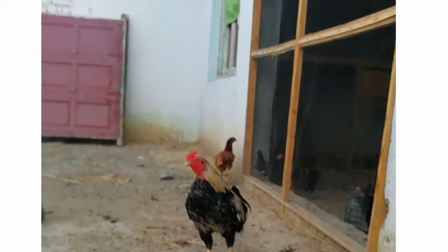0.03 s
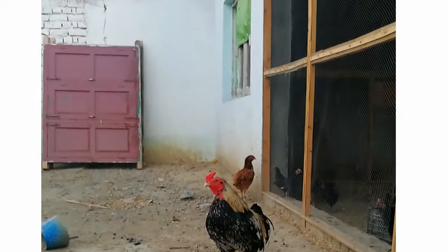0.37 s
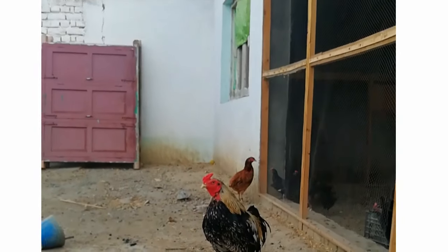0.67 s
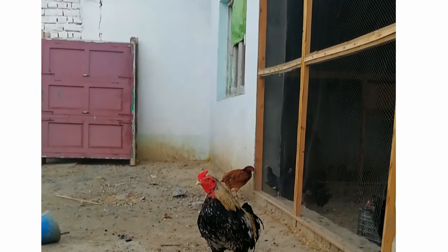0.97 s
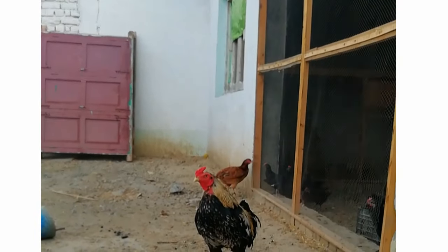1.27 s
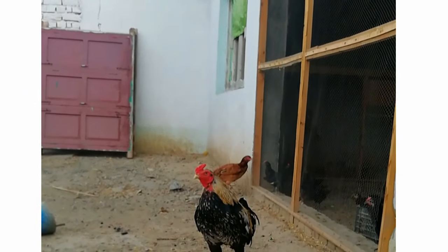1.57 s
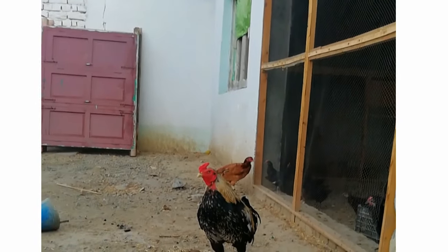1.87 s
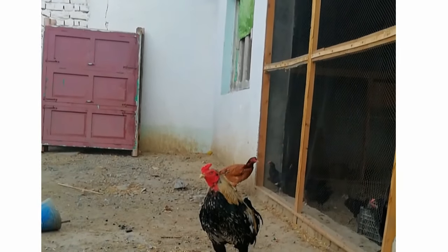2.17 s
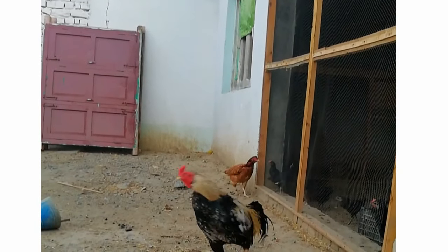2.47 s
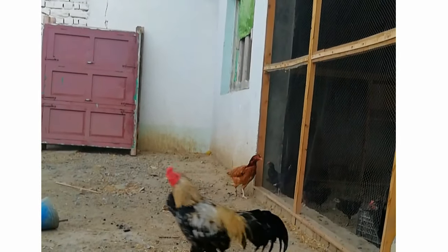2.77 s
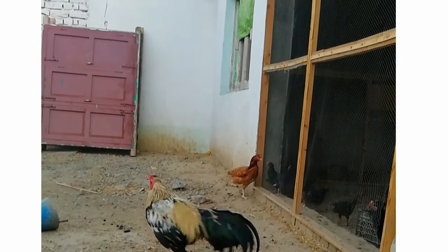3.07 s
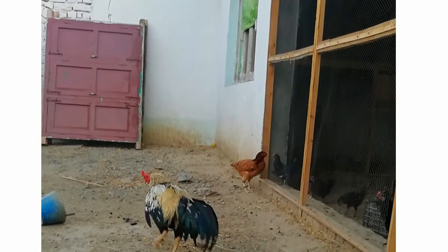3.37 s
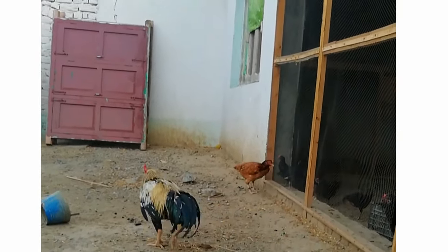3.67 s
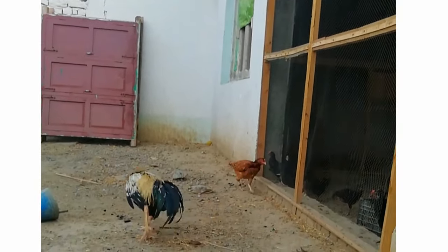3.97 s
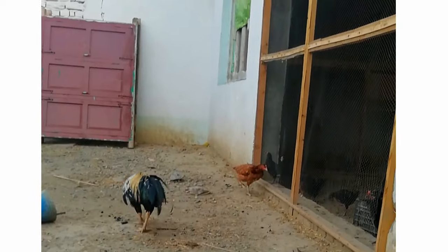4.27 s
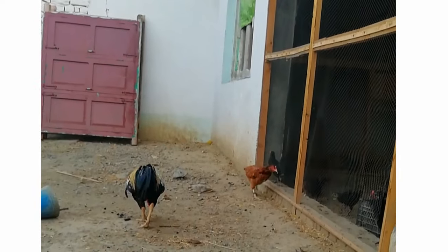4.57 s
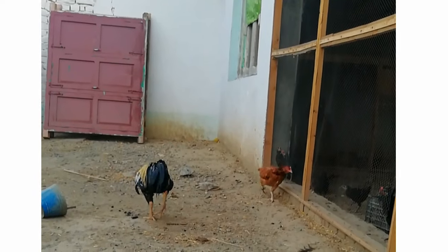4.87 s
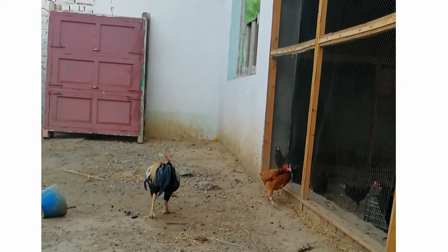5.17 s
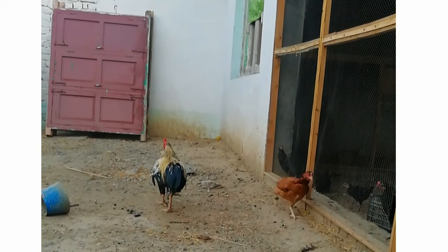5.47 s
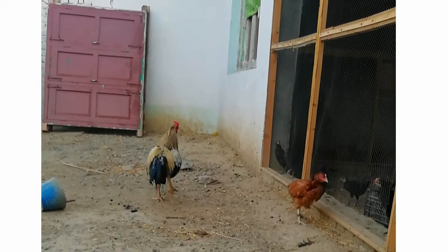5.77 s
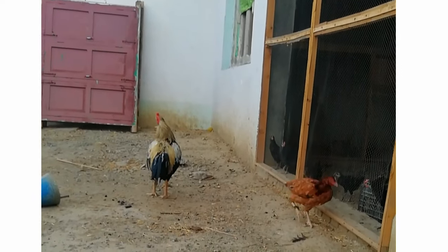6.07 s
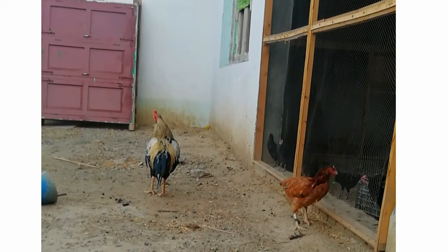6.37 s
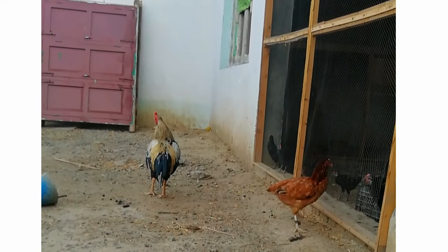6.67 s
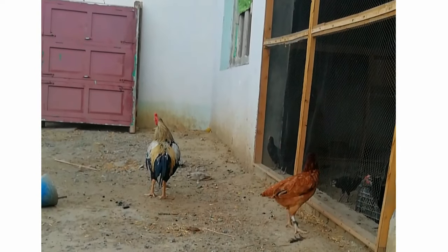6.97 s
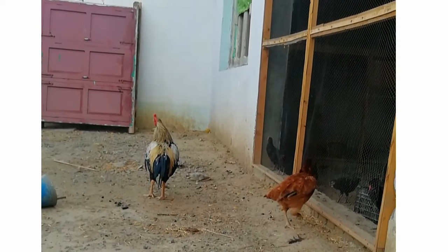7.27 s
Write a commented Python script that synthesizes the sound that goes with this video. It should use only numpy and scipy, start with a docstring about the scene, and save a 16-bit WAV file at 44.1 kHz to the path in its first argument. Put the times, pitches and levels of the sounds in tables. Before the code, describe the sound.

Young chickens whistle high, falling peeps throughout, one close by and the rest inside a coop. Feet scuff and beaks tick now and then. A rooster adds short clucks after a second, and hens join with strained whines and rasps. Near the end a few alarmed chips lead into the loudest whines. The close stereo sound carries short wall echoes over a faint outdoor wash.

```python
"""Chickens in a small walled yard, a close microphone pair beside a wire-fronted coop.
From the start young birds whistle falling peeps, one near by, the rest inside the coop; feet scuff
and beaks tick. A rooster clucks from 1 s on. From 2.4 s hens whine on a strained membrane and rasp
in pulses that ring the throat. Alarmed chips just before 6 s lead into the loudest whines and two
clucks with a low thud. The walls throw every call back over a faint outdoor wash and hum."""
import sys
import numpy as np
from scipy import signal
from scipy.fft import rfft, irfft
from scipy.io import wavfile

SR = 44100
rng = np.random.default_rng(int(sys.argv[2]) if len(sys.argv) > 2 else 0)


def master(y):
    """Save y as 16-bit WAV."""
    cut = np.clip(np.atleast_2d(y).T, -1, 1)
    pcm = np.round(cut * 32767)  # scale
    wavfile.write(sys.argv[1], SR, pcm.astype(np.int16))


N = 327663

# Event levels are at the source, ahead of filters and placing. Swell is the rise in level from start
# to end of a call; arch is the bend in frequency at mid-call.
# peeps close to the microphones: t/s, length/s, held f/Hz, leap/Hz, drop/Hz, level/dB, swell/dB
NEAR_PEEPS = [(0.062, 0.071, 3780, -4.5, 2233, -33.5, -2), (0.521, 0.34, 3952, 720, 390, -38.5, 6),
              (1.326, 0.27, 3865, 750, 397, -36.5, 9.5), (1.854, 0.18, 3897, 691, 1097, -34.5, 6.5),
              (4.215, 0.15, 3694, 221, 563, -43, 2.5), (4.615, .182, 4060, 263.5, 710, -41.5, 1),
              (5.36, 0.19, 3895, 627, 454, -40, 0)]
# peeps inside the coop: t/s, length/s, start f/Hz, end f/Hz, arch/Hz, level/dB, swell/dB
FAR_PEEPS = [(0, 0.051, 4780, 4270, 86, -47, -14), (0, 0.053, 2310, 2090, -17, -61.5, -8),
             (0.031, 0.07, 2490, 2320, 123, -58, -25), (0.293, 0.12, 1700, 2107, -18.5, -63.5, 11),
             (0.423, 0.13, 4430, 3370, -260, -60.5, -2), (0.568, 0.081, 2130, 1900, 12, -70, -7),
             (0.654, 0.096, 2660, 2670, 270, -64.5, -4), (0.7, 0.17, 3653, 2836, -120, -48, -1),
             (0.939, 0.091, 4040, 3640, -180, -60.5, -17), (1.116, 0.13, 2740, 2180, -130, -62.5, -2),
             (1.401, 0.086, 2570, 2100, 123, -55.5, -19), (1.485, 0.2, 3416, 2931, 41.5, -46, 7.5),
             (1.672, 0.081, 2635, 2174, 23, -54, -8), (1.771, 0.14, 2913, 2574, 35.5, -56.5, -2),
             (1.896, 0.084, 4700, 4650, 263, -56, 6), (1.92, 0.091, 3775, 2976, -11, -44, 2),
             (2.342, 0.073, 3550, 3750, 156, -64.5, 10), (2.547, 0.18, 3740, 3210, 280.5, -56, -2),
             (2.594, 0.13, 4670, 4540, 202.5, -59, 0), (2.737, 0.12, 4580, 3616, -230, -52.5, 6),
             (2.812, 0.089, 2570, 2290, 250, -54, -9), (2.898, 0.21, 3634, 2934, -59, -47.5, 11.5),
             (2.923, 0.15, 4870, 4620, 135, -59.0, 2), (3.104, 0.17, 4184, 3534, 151.5, -52, -1),
             (3.357, 0.051, 2390, 2130, 35, -54.5, -7), (3.371, 0.109, 3610, 2847, 6, -46.5, 7.5),
             (3.568, 0.22, 4295, 3650, -19.5, -53.5, 3), (3.781, 0.13, 3630, 2837, 25, -47.5, 5.5),
             (3.61, 0.17, 4720, 4390, 103, -60.5, 5), (3.951, 0.057, 3626, 3470, -64, -61, -8),
             (4.165, 0.12, 4460, 3800, -6, -61.5, -8), (4.178, 0.171, 5170, 4370, 79.5, -64, 8),
             (4.479, 0.14, 3650, 2770, 212.5, -56.5, 10), (4.667, 0.13, 4490, 2994, 143, -61.5, -8),
             (4.944, 0.12, 3650, 2486, 294.5, -55.5, 4.5), (5.024, 0.12, 4120, 3254, 142.5, -64, 5),
             (5.201, 0.06, 2456, 2210, 34, -62.5, -12), (5.766, 0.14, 3632, 3030, 78, -55, 11),
             (6.312, 0.198, 4704, 3110, 40.5, -62.0, 8), (6.517, 0.15, 3704, 3082, -29.5, -55, 6),
             (6.687, 0.14, 4920, 3440, 371.5, -56.5, -1), (6.842, 0.092, 4460, 4330, 31.5, -58, 4),
             (6.934, 0.1, 3604, 2833, 93.5, -46, 8.5), (7.147, 0.26, 4884, 3030, 400.5, -58.0, -4)]
# filter of a young bird's beak: f/Hz, gain/dB
BEAK_COLOUR = [(2000, 2.5), (4700, -0.5), (5400, -5), (6300, 7.5), (7200, -1.5), (8200, -7), (10000, -13),
               (15000, -5)]
# alarmed chips inside the coop: t/s, level/dB
ALARM_CHIPS = [(5.677, -49.5), (5.868, -48), (5.893, -55), (5.937, -54)]
# syllables of the hens' whines:
# t/s, length/s, start f/Hz, end f/Hz, arch/Hz, level/dB, swell/dB, roughness/0-1, 2nd harmonic/dB
HEN_WHINES = [(2.397, 0.18, 962, 954, 119, -41.5, -3, 0.31, -21.5),
              (3.203, .11, 1002, 1091, 28.5, -42, -2, 0.42, -16),
              (3.743, 0.051, 1295, 1256, 38, -47.5, 5, 0.1, -16.5),
              (3.887, 0.15, 1342, 1316, 3.5, -53.5, 2, .05, -13),
              (6.026, .155, 1103, 1062, 24.5, -33, 1, 0.43, -13),
              (6.172, 0.074, 1006, 970.5, -10.5, -31.5, -1, 0.16, -11),
              (6.295, 0.078, 1088, 1124, 19, -37, 2, .4, -21.5),
              (6.409, 0.067, 1158, 1185, 28, -34.5, -2, 0.5, -12),
              (6.51, 0.106, 1127, 1190, 12, -35, -11, 0.47, -17.5),
              (6.632, .13, 1134, 1161, 8, -36, -8.5, 0.4, -14.5),
              (6.79, .16, 1172, 1164, 9.5, -41.5, -1, 0, -7),
              (6.81, 0.19, 1068, 957, 50, -44, -13, 0.46, -18)]
# hens' rasps, f being the lowest throat resonance:
# t/s, length/s, start f/Hz, end f/Hz, arch/Hz, level/dB, swell/dB, pulse rate/Hz
HEN_RASPS = [(2.427, .22, 1220, 940, 40, -46.5, 8, 225), (3.191, 0.24, 974, 1120, 149, -44, 3.5, 265),
             (4.36, 0.38, 2280, 1670, -200, -58, 14, 68), (5.472, 0.081, 1000, 840, -130, -51.5, 0, 150),
             (5.867, 0.16, 1710, 1780, -70, -53, 7, 165), (6.01, 0.19, 2360, 1810, 36, -48, 0.5, 135),
             (6.79, 0.23, 995, 970, 112, -46, -6, 112)]
# resonances of a hen's throat: multiple of the lowest, width/Hz, gain/dB
HEN_THROAT = [(1, 170, 14), (1.45, 240, 6.5), (1.95, 450, -2), (4.3, 900, -21), (7, 700, -20.5)]
# rooster's clucks: t/s, level/dB, f/Hz, length/s, beak opening (factor on the throat's frequencies)
ROOSTER_CLUCKS = [(1.146, -40, 632, 0.029, 0.86), (1.519, -49, 587, 0.036, 0.79),
                  (1.989, -44, 667, 0.037, 0.79), (2.566, -40.5, 573, 0.055, 0.86),
                  (3.232, -33, 574.5, 0.038, 1), (3.823, -33.5, 592.4, 0.046, 0.98),
                  (4.455, -37.5, 544.5, 0.041, 0.9), (4.81, -36.5, 563, 0.029, 0.93),
                  (5.123, -34.5, 572.7, 0.032, 0.96), (5.565, -40, 545.4, 0.037, 0.89),
                  (6.288, -37, 598, 0.053, 0.88), (6.479, -41.5, 689, 0.041, 0.84),
                  (7.164, -51, 618, 0.053, 0.79)]
# filter of the rooster's throat: f/Hz, gain/dB
ROOSTER_THROAT = [(200, -18), (450, -23), (600, -11.5), (800, -4), (1050, 4.5), (1350, -0.5), (2000, -26),
                  (4000, -17), (8000, -72)]
# hoarse air and rustling feathers: t/s, length/s, level/dB, centre f/Hz
AIR_PUFFS = [(0.279, 0.13, -69, 4400), (2.135, 0.11, -63.5, 5100), (2.437, 0.14, -61, 5600),
             (3.131, 0.1, -52.5, 7150), (3.201, 0.19, -55.5, 5800), (3.941, 0.087, -66.5, 4900),
             (5.602, 0.23, -56, 4520), (5.854, 0.11, -50, 2940), (5.855, 0.11, -57, 5670),
             (5.995, 0.24, -64.5, 7450), (6.294, 0.48, -54, 2150), (6.493, 0.53, -67, 5900),
             (7.031, 0.14, -55.5, 4300)]
# spectrum of one puff: multiple of the centre, level/dB
PUFF_SPECTRUM = [(.1, -62), (.45, -21), (.75, 1), (1, 0.5), (1.25, -4.5), (1.7, -26.5), (4, -32)]
# dull low thuds: feet scuffing, and the low body of the two clucks near 6.3 and 6.5 s: t/s, level/dB
LOW_THUDS = [(.863, -57), (1.283, -55.5), (1.628, -61.5), (2.925, -64.5), (5.385, -58.5), (6.3, -48.5),
             (6.47, -53)]
# dull spectrum of a thud: f/Hz, level/dB
THUD_SPECTRUM = [(100, -14), (320, -3.5), (750, 6), (1500, 8), (3000, -5), (7000, -17), (15000, -60)]
# ticks of beaks and grit: t/s, level/dB
BEAK_TICKS = [(0.7407, -50), (0.8636, -38.5), (0.9892, -51), (1.0204, -46.5), (1.081, -51), (1.281, -47),
              (1.6285, -36.5), (2.9257, -49.5), (3.1537, -31), (3.167, -38), (4.7515, -59), (5.1113, -50),
              (5.3906, -41.5), (5.8027, -42), (5.8197, -39.5)]
# sharp spectrum of a tick: f/Hz, level/dB
TICK_SPECTRUM = [(1000, -34), (4000, 5.5), (7500, 4.5), (10000, -10.5), (15000, -33)]
# spectrum of the outdoor wash: f/Hz, level/dB
WASH_SPECTRUM = [(12, -41), (20, -1), (83, -4), (333, -16), (404, -19.5), (614, -22), (1340, -13),
                 (1870, -15), (2090, -15.5), (2330, -20), (3260, -15.5), (3640, -12.5), (5690, -22.5),
                 (7310, -21), (15500, -35)]
# reverberation between the walls: f/Hz, time to fall by 60 dB/s
WALL_DECAY = [(200, 0.82), (1000, 0.43), (3500, 0.55), (8000, 0.5), (15000, 0.092)]
# the microphone pair's filter on left minus right: f/Hz, gain/dB
SIDE_LIFT = [(40, -1), (110, 5.5), (200, 7.5), (380, 16), (700, 12), (1300, -1), (2500, 0), (8000, 0)]


def peeps(calls, jitter, flutter_db, second_db, third_db, hoarse_db, hoarse_hz, drift=0.00785):
    """Young birds' whistles: the high, strained part trembles and turns hoarse, the low part is purer."""
    out = np.zeros(N)
    for start, hz, strength in calls:
        strain = (hz / 4000) ** 2.97
        hz = hz * (1 + drift * wobble(len(hz), 19.5) + jitter * strain * wobble(len(hz), 113))
        hoarseness = 1 + from_db(hoarse_db) * strain * wobble(len(hz), hoarse_hz)
        flutter = from_db(flutter_db * wobble(len(hz), 42))
        add(out, start, syrinx(hz, [0, second_db, third_db]) * hoarseness * strength * flutter)
    return colour(out, BEAK_COLOUR)


def near_calls(leap_at_s=.032, leap_width_s=.038, sag_hz_per_s=1200, drop_s=.012):
    """The near bird's (start, pitch, strength): a leap, a slow sag, a drop as the breath ends."""
    for start, length, held_hz, leap_hz, drop_hz, db, swell_db in NEAR_PEEPS:
        t = np.linspace(0, length, int(length * SR))
        leap = leap_hz * np.exp(-((t - leap_at_s) / leap_width_s) ** 2)
        drop = drop_hz * np.exp((t - length) / drop_s)
        hz = held_hz + leap - sag_hz_per_s * t - drop
        yield start, hz, breath(length, db, swell_db, attack_s=.015, release_s=.0046)


def coop_calls():
    """The coop birds' (start, pitch, strength): one arched glide to a breath."""
    for start, length, start_hz, end_hz, arch_hz, db, swell_db in FAR_PEEPS:
        hz = glide(length, start_hz, end_hz, arch_hz)
        yield start, hz, breath(length, db, swell_db, attack_s=.0062, release_s=.0048)


def chips(top_hz=3400, bottom_hz=1450, length_s=.014):
    """Alarm in the coop: the pitch collapses by over an octave within a hundredth of a second."""
    out = np.zeros(N)
    progress = np.arange(int(length_s * SR)) / (length_s * SR)
    hz = np.interp(progress, [0, .7, 1], [top_hz, bottom_hz, bottom_hz])
    soft_edges = signal.windows.tukey(len(hz), 400 / len(hz))
    for start, db in ALARM_CHIPS:
        add(out, start, from_db(db) * syrinx(hz, [0, -13]) * soft_edges)
    return out


def whines(jitter=.069, shimmer_depth=.46, throb_depth=1.06, half_db=-17):
    """Hens hold notes; the strained membrane shakes, throbs and alternates strong and weak cycles."""
    out = np.zeros(N)
    for start, length, start_hz, end_hz, arch_hz, db, swell_db, rough, second_db in HEN_WHINES:
        hz = glide(length, start_hz, end_hz, arch_hz)
        hz *= 1 + jitter * rough * wobble(len(hz), 218)
        tone = syrinx(hz, [0, second_db, 2 * second_db - 12, second_db - 10.5])
        tone += syrinx(1.5 * hz, [half_db]) * rough * wobble(len(hz), 130)  # between harmonics 1 and 2
        throb = 1 + throb_depth * rough * np.tanh(wobble(len(hz), 68))
        shimmer = 1 + shimmer_depth * rough * wobble(len(hz), 116)
        strength = breath(length, db, swell_db, attack_s=.014, release_s=.02)
        add(out, start, tone * throb * shimmer * strength)
    return out


def rasps(unevenness=.03, air=.07, sag=.22):
    """Uneven pulses, slowing as the breath runs out, and a little air ring a hen's moving throat."""
    out = np.zeros(N)
    for start, length, start_hz, end_hz, arch_hz, db, swell_db, pulse_hz in HEN_RASPS:
        hz = glide(length, start_hz, end_hz, arch_hz)
        slowing = sag * np.linspace(.5, -.5, len(hz))
        cycles = np.cumsum(pulse_hz * np.exp(slowing + unevenness * wobble(len(hz), 120))) / SR
        pulses = np.diff(np.floor(cycles), prepend=0)
        drive = unit(pulses) + air * rng.standard_normal(len(hz))
        voice = sum(from_db(gain_db) * resonate(resonate(drive, k * hz, width), k * hz, 2 * width)
                    for k, width, gain_db in HEN_THROAT)
        add(out, start, unit(voice) * breath(length, db, swell_db, attack_s=.0072, release_s=.033))
    return colour(out, [(100, -16), (8200, 5.5), (10500, -5), (15000, -35)])


def clucks(jitter=.06, break_ratio=.59):
    """The rooster's short note swells, then its pitch breaks downwards as the beak shuts."""
    out = np.zeros(N)
    for start, db, pitch_hz, length, opening in ROOSTER_CLUCKS:
        progress = np.linspace(0, 1, int(length * SR))
        hz = pitch_hz * np.interp(progress, [0, .45, .65, 1], [.92, 1.04, .95, break_ratio])
        hz *= 1 + jitter * wobble(len(hz), 400)
        throat = [(f * opening, gain_db) for f, gain_db in ROOSTER_THROAT]
        voice = colour(syrinx(hz, harmonics_db=np.zeros(14)), throat)
        swell = np.interp(progress, [0, .25, .7, 1], [.13, .29, .32, .16])
        add(out, start, from_db(db) * unit(voice * swell))
    return out


def hisses():
    """Hoarse air and rustling feathers: grainy puffs of noise, each about an octave wide."""
    out = np.zeros(N)
    for start, length, db, centre_hz in AIR_PUFFS:
        size = int(length * SR)
        air = colour(rng.standard_normal(size), [(k * centre_hz, gain) for k, gain in PUFF_SPECTRUM])
        grain = 1 + wobble(size, 150)
        add(out, start, from_db(db) * unit(air * grain) * signal.windows.tukey(size, .3))
    return out


def bursts(events, spectrum, decay_s):
    """Dull thuds or sharp ticks: each is a burst of noise that dies away at once."""
    out, t = np.zeros(N), np.arange(SR // 5) / SR
    for start, db in events:
        noise = unit(colour(rng.standard_normal(len(t)), spectrum))
        add(out, start, from_db(db) * noise * np.exp(-t / decay_s))
    return out


def yard(x, left_db, right_db, early_db, tail_db, early_s=.04, echoes=9, lag_samples=25):
    """Direct sound reaches the right microphone first; wall echoes and a diffuse tail follow."""
    direct = np.array([from_db(left_db) * np.roll(x, lag_samples), from_db(right_db) * x])
    early = np.zeros((2, SR))
    delays = ((.003 + early_s * rng.random((2, echoes))) * SR).astype(int)
    strengths = rng.choice([-1., 1.], delays.shape) * np.exp(-delays / (early_s * SR))
    np.put_along_axis(early, delays, strengths, 1)
    hz, t, noise = signal.stft(rng.standard_normal((2, SR)), SR, nperseg=256)
    decay = from_db(-60 * t / curve_at(WALL_DECAY, hz)[:, None])
    build_up = np.minimum(t / .015, 1)
    tail = signal.istft(noise * decay * build_up, SR, nperseg=256)[1][:, :SR]
    walls = (from_db(early_db) * unit(early) + from_db(tail_db) * unit(tail)) / np.sqrt(SR)
    return direct + signal.fftconvolve(x[None], walls, axes=1)[:, :N]


def background(wash_db=-61, waver_db=.5, hum_hz=59.8, hum_db=-76):
    """A faint outdoor wash all round the microphones and a low wavering hum in the centre."""
    wash = unit(colour(rng.standard_normal((2, N)), WASH_SPECTRUM))
    wash *= from_db(wash_db - waver_db * wobble(N, .85))
    hum = syrinx(hum_hz * (1 + .0515 * wobble(N, 4.95)), [hum_db])
    return wash + hum * (1 + .15 * wobble(N, 1.6))


def syrinx(hz, harmonics_db):
    """A tone with its overtones, as from the vibrating membrane of a bird's voice."""
    phase = 2 * np.pi * np.cumsum(hz) / SR
    return np.sqrt(2) * sum(from_db(db) * np.sin(k * phase) * (k * hz < SR / 2)
                            for k, db in enumerate(harmonics_db, 1))


def breath(length, db, swell_db, attack_s, release_s):
    """The strength of one breath: attack, a hold that swells or fades evenly, release."""
    t = np.linspace(0, length, int(length * SR))
    gate = np.clip(np.minimum(t / attack_s, (length - t) / release_s), 0, 1)
    return from_db(db + swell_db * (t / length - .5)) * np.sin(np.pi / 2 * gate)


def glide(length, start_hz, end_hz, arch_hz):
    """A frequency that slides from start to end along one arch."""
    progress = np.linspace(0, 1, int(length * SR))
    return start_hz + (end_hz - start_hz) * progress + arch_hz * (1 - (2 * progress - 1) ** 2)


def resonate(x, hz, width_hz):
    """A resonance of gain 1 that follows the curve hz."""
    turn = np.exp(2j * np.pi * np.cumsum(hz) / SR)
    pole = np.exp(-np.pi * width_hz / SR)
    return 2 * (turn * signal.lfilter([1 - pole], [1, -pole], x / turn)).real


def wobble(size, hz):
    """Random unsteadiness of rms near 1, up to about hz."""
    padded = size + SR // 4
    f = np.fft.rfftfreq(padded, 1 / SR)
    return unit(irfft(rfft(rng.standard_normal(padded)) / (1 + (f / hz) ** 4)))[:size]


def colour(x, points):
    """Filters by a curve of f/Hz, gain/dB."""
    size = x.shape[-1]
    gain = from_db(curve_at(points, np.fft.rfftfreq(2 * size, 1 / SR)))
    return irfft(rfft(x, 2 * size) * gain)[..., :size]


def curve_at(points, hz):
    f, value = np.transpose(points)
    return np.interp(np.log(hz + 1), np.log(f + 1), value)


def add(mix, start_s, sound):
    part = mix[max(round(start_s * SR), 0):][:len(sound)]
    part += sound[:len(part)]


def from_db(db):
    return 10 ** (np.asarray(db) / 20)


def unit(x):
    return x / np.sqrt(np.mean(x ** 2) + 1e-20)


def scene():
    """The yard birds are louder on the left; the coop, to the right, is heard mostly off the walls."""
    near = peeps(near_calls(), jitter=.0058, flutter_db=2.5, second_db=-22.5, third_db=-35,
                 hoarse_db=-15.5, hoarse_hz=500)
    coop = peeps(coop_calls(), jitter=.0117, flutter_db=3, second_db=-17.5, third_db=-44,
                 hoarse_db=-10, hoarse_hz=433)
    thuds = bursts(LOW_THUDS, THUD_SPECTRUM, decay_s=.036)
    ticks = from_db(-4.5) * bursts(BEAK_TICKS, TICK_SPECTRUM, decay_s=.0019)
    return (yard(near, left_db=-1.5, right_db=-8.5, early_db=-8.5, tail_db=-13)
            + yard(coop + chips(), left_db=-8, right_db=-2.5, early_db=2, tail_db=-4.5)
            + yard(whines(), left_db=-2, right_db=-16, early_db=-5.5, tail_db=-9.5)
            + yard(rasps(), left_db=-2.5, right_db=-6, early_db=1, tail_db=-2)
            + yard(hisses(), left_db=.5, right_db=-17.5, early_db=1, tail_db=-6)
            + yard(clucks(), left_db=-9, right_db=-16, early_db=-12.5, tail_db=-14.5)
            + yard(thuds + ticks, left_db=4, right_db=-12.5, early_db=2, tail_db=-2)
            + background())


def record(dry):
    """The close microphone pair widens its image by lifting the low side signal, then cuts the top."""
    mid = dry.mean(0)
    side = colour((dry[0] - dry[1]) / 2, SIDE_LIFT)
    low_pass = signal.firwin(511, cutoff=15750, window=("kaiser", 9), fs=SR)
    return signal.oaconvolve(np.array([mid + side, mid - side]), low_pass[None], "same")


dry = scene()
out = record(dry)
master(out)
```